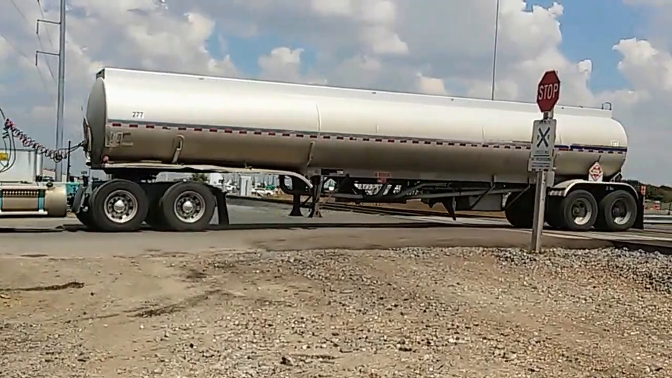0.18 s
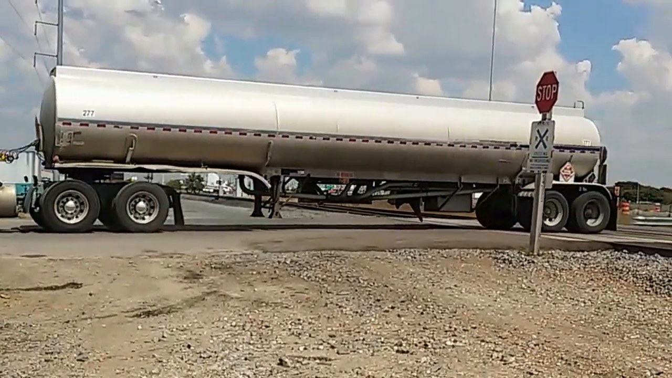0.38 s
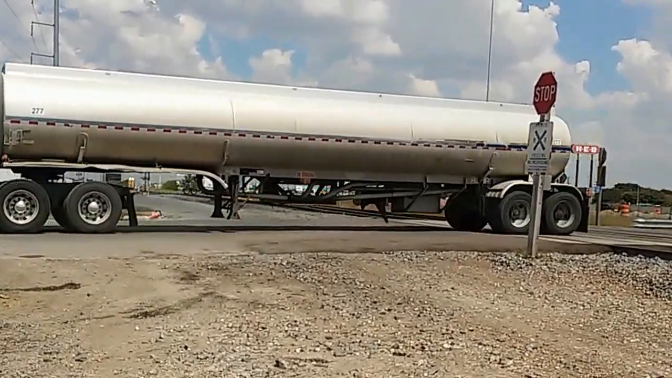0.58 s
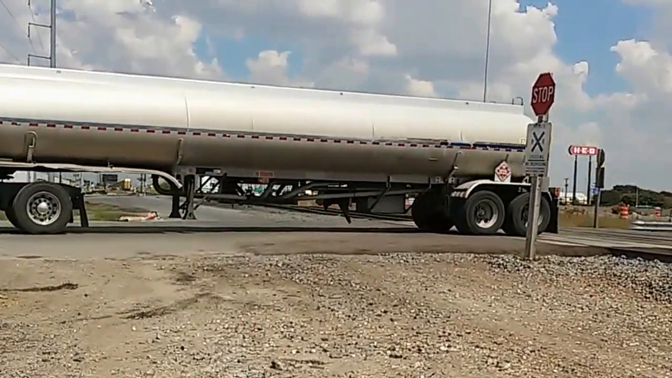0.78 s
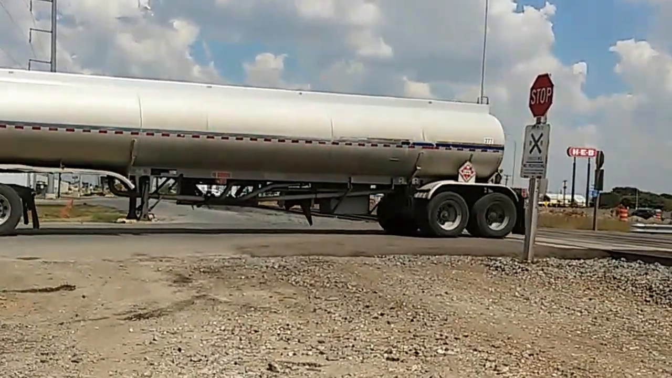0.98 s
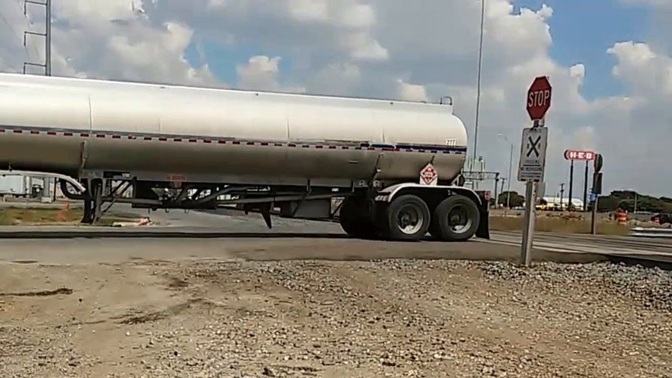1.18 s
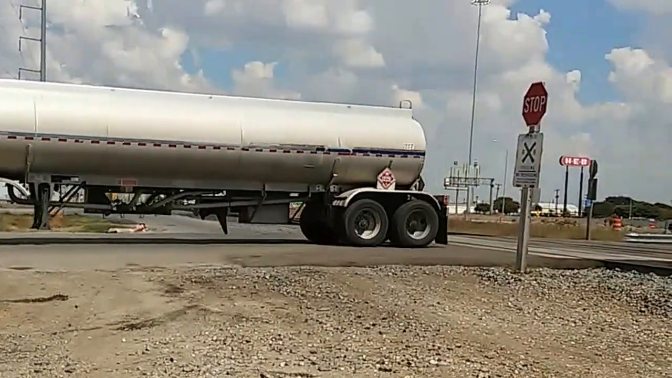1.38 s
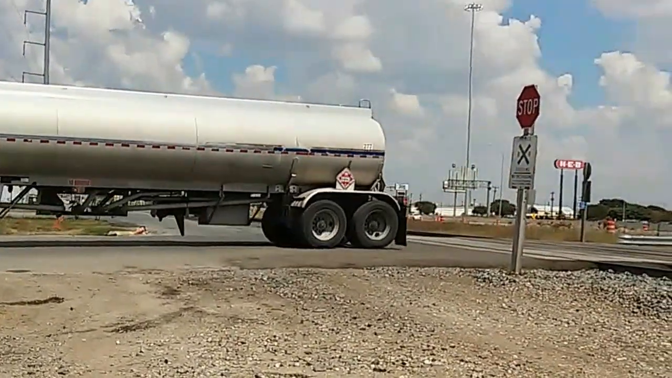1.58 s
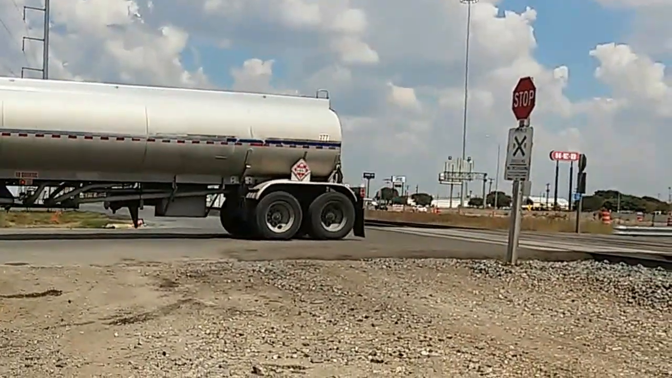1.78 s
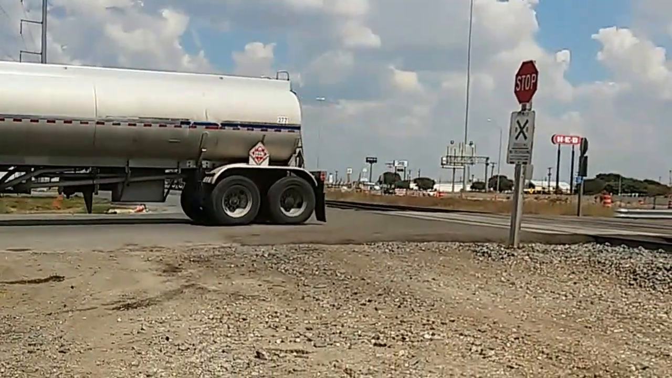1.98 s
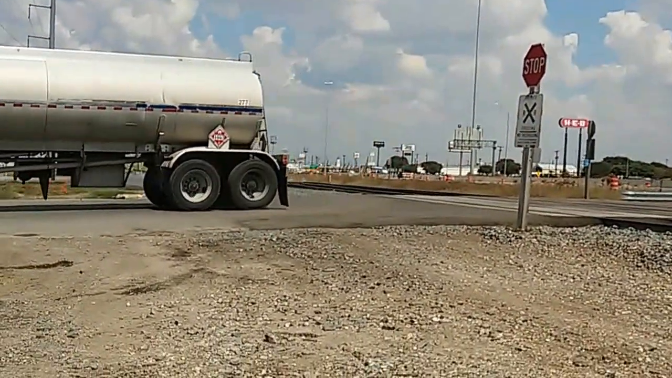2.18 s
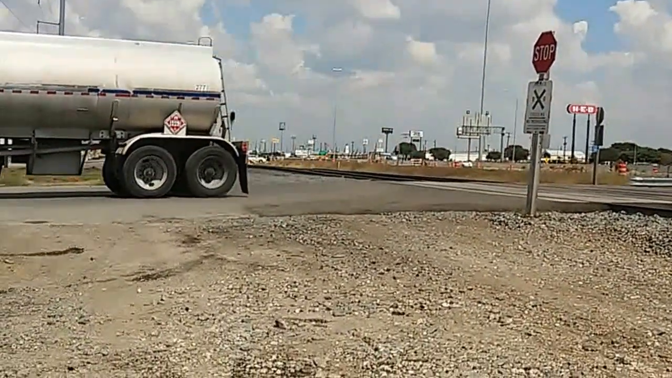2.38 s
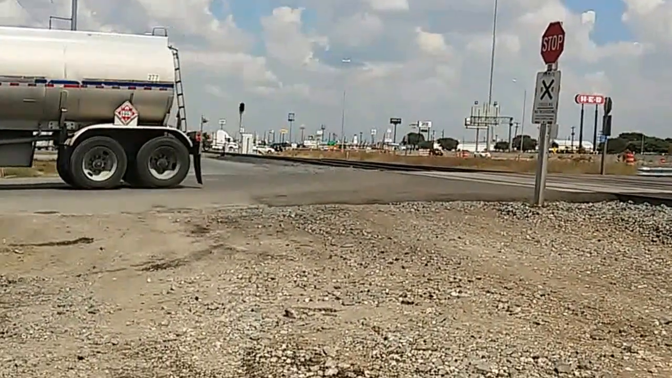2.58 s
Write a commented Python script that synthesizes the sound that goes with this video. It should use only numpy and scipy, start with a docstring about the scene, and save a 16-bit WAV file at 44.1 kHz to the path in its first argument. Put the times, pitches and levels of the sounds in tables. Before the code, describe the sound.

A sudden loud air-brake release hisses from a diesel tanker truck and thins out quickly; the engine then clatters and drones unevenly upward, with trailer rasps and squeaks, heard outdoors in mono from the gravel roadside.

```python
"""A diesel tanker truck pulls away from a railway crossing, heard in mono from the gravel verge.
Low wind buffets come first, over tyres and an engine bay's whine; then the air system dumps its pressure
in one sharp, loud hiss of shaped noise. The engine speed dips, then climbs unevenly: firings drone as
multiples of the bank rate and pulse the noise of puffs and clatter. Later the exhaust booms, the trailer's
running gear rasps and squeaks in short noise swells, and the hissing turbo starts a climbing whistle."""
import sys
import numpy as np
from scipy import signal
from scipy.fft import rfft, irfft
from scipy.io import wavfile
from scipy.ndimage import uniform_filter1d

SR = 44100
rng = np.random.default_rng(int(sys.argv[2]) if len(sys.argv) > 2 else 0)


def transcribe(signal):
    """Save signal, clipped to [-1, 1], as a 16-bit WAV file at the path in sys.argv[1]."""
    frames = np.atleast_2d(signal).T
    limited = np.clip(frames, -1, 1)
    pcm = np.round(limited * 32767).astype(np.int16)
    wavfile.write(sys.argv[1], SR, pcm)


N = 114660  # samples, 2.6 s
TOP_HZ = 15750  # upper limit of the sound

# Spectrum of the low rumble of exhaust and tyres. Each row: frequency in Hz, density in dB per Hz.
RUMBLE_SPECTRUM = [(20, -12), (45, -10.5), (70, -9), (100, -3), (175, -1.5), (250, -3.5), (355, -7),
                   (450, -12), (600, -12.5), (800, -26), (1500, -55)]


def undb(db):
    """Level to amplitude: 20 dB is a factor of ten."""
    return 10 ** (np.asarray(db) / 20)


def unit(x):
    """Normalisation: scale to rms 1."""
    return x / np.sqrt(np.mean(x ** 2))


def curve(rows, axis=1):
    """Linear interpolation: one column of a time table, sample by sample."""
    rows = np.array(rows, float)
    return np.interp(np.arange(N) / SR, rows[:, 0], rows[:, axis])


def lift(hz, peaks):
    """Resonance: decibels that peaks of given frequency, width and height add at these frequencies."""
    return sum(db / (1 + (2 * (hz - f) / width) ** 2) for f, width, db in peaks)


def colour(x, points, peaks=()):
    """Spectral shaping: filter a sound by a spectrum and resonances, and scale it to rms 1."""
    hz = np.arange(N // 2 + 1) * SR / N + 1e-3  # the offset avoids log(0)
    points = np.array(points, float)
    db = np.interp(np.log(hz), np.log(points[:, 0]), points[:, 1]) + lift(hz, peaks)
    low_cut = np.minimum(hz / points[0, 0], 1) ** 2
    gain = undb(db) * low_cut * (hz < TOP_HZ)
    return unit(irfft(rfft(x) * gain, N))


def noise():
    """White noise: independent samples have equal power at all frequencies."""
    return rng.standard_normal(N)


def walk(rate):
    """Slow random fluctuation: noise averaged twice over 1/rate seconds, with a spread of 1."""
    k = max(int(SR / rate), 1)
    once = uniform_filter1d(noise(), k, mode="wrap")
    return unit(uniform_filter1d(once, k, mode="wrap"))


def swell(t, at, length):
    """Gaussian envelope: a brief swell with its top at one moment."""
    return np.exp(-((t - at) / length) ** 2)


def road_and_wind(t):
    """Broadband excitation: tyres rumble on the road; puffs of wind strike the microphone."""
    # Level of the tyres. Each row: time in seconds, level in dB.
    road_level = [(0, -41.5), (.18, -49), (.4, -53), (.7, -52.5), (1.0, -50.5), (1.4, -49.5), (1.9, -50),
                  (2.25, -50.5), (2.4, -48.5), (2.6, -53)]
    # Puffs of wind. Each row: time of the top in seconds, level in dB, length in seconds.
    puffs_of_wind = [(0.013, -42, 0.017), (0.137, -38, 0.02), (0.29, -56, .04), (1.29, -53, 0.049)]
    # Spectrum of the wind. Each row: frequency in Hz, density in dB per Hz.
    wind_spectrum = [(18, -8), (35, 1), (70, -2), (130, -7), (250, -2.5), (600, -50)]
    road = undb(curve(road_level) + walk(35)) * colour(noise(), RUMBLE_SPECTRUM)
    gusts = sum(undb(db) * swell(t, at, length) for at, db, length in puffs_of_wind)
    return road + gusts * colour(noise(), wind_spectrum)


def running_gear(t):
    """Amplitude modulation: short grainy noise rasps swell and fade in the trailer's metalwork."""
    # Rasps. Each row: time of the top in seconds, level in dB, rise in seconds, fall in seconds,
    # gain of the treble in dB.
    rasps = [(1.427, -38.5, .035, 0.14, 6), (1.59, -41, 0.023, 0.018, -2), (1.78, -41.5, .022, 0.055, -8),
             (2.038, -36, 0.029, .025, -3.5), (2.104, -36.5, 0.031, 0.049, 0),
             (2.262, -47, 0.025, .035, 6.5), (2.43, -32.5, 0.026, 0.033, -3.5),
             (2.472, -34.5, 0.03, 0.075, -3)]
    # Spectrum of the rasps. Each row: frequency in Hz, density in dB per Hz.
    gear_spectrum = [(400, -20), (780, -27), (1050, 1.5), (1450, -6), (1850, 2.5), (2080, 4.5), (2400, -3),
                     (3300, -2), (4000, 2.5), (4600, -2), (5400, -5), (6200, -9), (8000, -13), (9600, -6),
                     (11200, -2), (12800, -8.5), (15500, -13)]
    grain_db = 1
    rasp = colour(noise() * undb(grain_db * walk(500)), gear_spectrum)
    treble = signal.sosfiltfilt(signal.butter(2, 6500, "high", fs=SR, output="sos"), rasp)
    out = np.zeros(N)
    for at, db, rise, fall, treble_db in rasps:
        before = np.minimum(t - at, 0) / rise
        after = np.maximum(t - at, 0) / fall
        # Gaussian rise, then a rounded top that falls nearly exponentially
        shape = np.exp(-before ** 2 + 1 - np.hypot(1, 2 * after) ** 0.97)
        out += undb(db) * shape * (rasp + (undb(treble_db) - 1) * treble)
    return out


def squeaks(t):
    """Narrow-band noise: slow random amplitudes on a sine and cosine make each squeak of metalwork rough."""
    # Squeaks. Each row: time of the top in seconds, frequency in Hz, level in dB, length in seconds.
    squeak_rows = [(1.164, 2755, -51, 0.052), (1.405, 2773, -39, 0.024), (1.431, 1873, -41, 0.051),
                   (1.414, 2470, -41, 0.022), (1.438, 4530, -40.5, 0.017), (1.47, 2830, -41.5, 0.049),
                   (1.63, 1151, -46, 0.066), (2.032, 2130, -41, 0.013), (2.103, 2050, -39.5, 0.02),
                   (2.272, 2162, -44, 0.02), (2.263, 3660, -49.5, 0.024), (2.442, 2120, -47, 0.014),
                   (2.47, 5350, -44, 0.021)]
    roughness_hz = 260  # rate of the random amplitudes
    out = np.zeros(N)
    for at, hz, db, length in squeak_rows:
        angle = 2 * np.pi * hz * t
        tone = unit(walk(roughness_hz) * np.sin(angle) + walk(roughness_hz) * np.cos(angle))
        out += undb(db) * swell(t, at, length) * tone
    return out


def turbo():
    """Flow noise and rotor tone: air hisses through the turbo; its whistle climbs as it spools up."""
    # Spectrum of the air's hiss. Each row: frequency in Hz, density in dB per Hz.
    hiss_spectrum = [(3000, -20.5), (5000, -11.5), (7000, -11), (8700, -10), (9700, -3.5), (10800, 1.5),
                     (11600, -2.5), (12500, -8), (14000, -17), (15800, -32)]
    # Level of the hiss. Each row: time in seconds, level in dB.
    hiss_level = [(0, -36.5), (.08, -35.5), (.2, -43.5), (.68, -44.5), (.82, -50), (.9, -43), (1.08, -45.5),
                  (1.2, -55.5), (1.28, -49), (1.33, -42.5), (1.46, -39), (1.62, -44), (1.8, -44.5),
                  (1.96, -59), (2.2, -56), (2.37, -61), (2.6, -56)]
    # Narrow singing edge on the hiss. Each row: frequency in Hz, width in Hz, lift in dB.
    edge_peak = [(10830, 900, 42)]
    # Level of the edge. Each row: time in seconds, level in dB.
    edge_level = [(0, -32.5), (.08, -37.5), (.2, -45), (.6, -61), (1.2, -74)]
    # Whistle. Each row: time in seconds, frequency in Hz, level in dB.
    whistle_path = [(1.7, 7700, -78), (1.87, 8000, -82), (2.15, 8730, -55), (2.38, 9545, -69),
                    (2.6, 10000, -68)]
    upper_ratio, upper_db = 1.5, -1  # second whistle tone
    pitch_waver = 0.006  # spread as a share of the frequency

    hiss = colour(noise(), hiss_spectrum) * undb(curve(hiss_level) + 0.84 * walk(48))
    edge = undb(curve(edge_level)) * colour(noise(), hiss_spectrum, edge_peak)
    pitch = curve(whistle_path) * (1 + pitch_waver * walk(200))
    angle = 2 * np.pi * np.cumsum(pitch) / SR
    lower = undb(3 * walk(30)) * np.sin(angle)
    upper = undb(upper_db + 3.5 * walk(30)) * np.sin(upper_ratio * angle)
    return hiss + edge + (lower + upper) * undb(curve(whistle_path, axis=2))


def exhaust_drone(turn):
    """Harmonic series: periodic firing sounds multiples of the bank rate in the exhaust."""
    # Drone. Each row: time in seconds, levels of the 2nd, 4th and 5th multiple in dB.
    drone_levels = [(0, -60, -52, -66), (.27, -55, -56, -60), (.42, -72, -51.5, -68),
                    (.6, -49.5, -52.5, -58), (.8, -61, -56.5, -49.5), (.92, -57, -52, -47.5),
                    (1.08, -56, -53, -60.5), (1.22, -55.5, -52, -45.5), (1.33, -58, -54, -41),
                    (1.45, -51, -63, -46.5), (1.64, -52, -57.5, -52), (2.1, -56.5, -57, -64.5),
                    (2.45, -52, -68, -53), (2.6, -55, -39, -53)]
    waver_db = 0.8
    out = np.zeros(N)
    for column, multiple in enumerate((2, 4, 5), start=1):
        level = curve(drone_levels, axis=column) + waver_db * walk(4.3)
        out += undb(level) * np.sin(2 * np.pi * (multiple * turn + rng.random()))
    return np.sqrt(2) * out  # a sine of rms 1 has this peak


def exhaust_booms(t):
    """Frequency modulation: brief low tones of wandering pitch boom in the exhaust."""
    # Booms. Each row: time of the top in seconds, frequency in Hz, level in dB, length in seconds.
    boom_rows = [(1.62, 368, -56.5, 0.058), (1.793, 359.6, -50, 0.05), (2.554, 351, -41.5, 0.022)]
    wander_hz = 7
    out = np.zeros(N)
    for at, hz, db, length in boom_rows:
        angle = 2 * np.pi * np.cumsum(hz + wander_hz * walk(61)) / SR
        out += undb(db) * swell(t, at, length) * np.sin(angle)
    return np.sqrt(2) * out


def wander(x):
    """Independent band fluctuation: parts of a sound swell and sink on their own below a steady top band."""
    wander_db = 0.6
    out = 0
    for split_hz in (1130, 2000, 4700):
        low = signal.sosfiltfilt(signal.butter(4, split_hz, fs=SR, output="sos"), x)
        out = out + low * undb(wander_db * walk(21))
        x = x - low
    return out + x


def block_clatter(kick):
    """Partly pulsed noise: each firing kick swells the clatter of the block."""
    # Spectrum of the clatter. Each row: frequency in Hz, density in dB per Hz.
    clatter_spectrum = [(300, -8), (600, -5), (790, -9), (1000, 4), (1170, 5), (1400, 2), (1750, 5),
                        (2020, 6), (2350, -2.5), (2750, 0), (3300, -5.5), (4400, -7.5), (6300, -15.5),
                        (9000, -17), (15500, -14)]
    # Level of the clatter. Each row: time in seconds, level in dB.
    clatter_level = [(0, -42), (.18, -42), (.5, -50.5), (.8, -43.5), (1.0, -44.5), (1.25, -43), (1.42, -40),
                     (1.63, -39), (1.78, -42.5), (1.95, -43), (2.2, -45.5), (2.38, -45), (2.6, -44.5)]
    pulsing = 0.3  # share of the amplitude that follows the kicks
    pulsed = (1 - pulsing + pulsing * unit(kick)) * noise()
    return wander(colour(pulsed, clatter_spectrum)) * undb(curve(clatter_level) + 0.5 * walk(60))


def bay_whine():
    """Band-shaped noise: a rough whine from the engine bay fades as the cab moves away."""
    # Spectrum of the whine. Each row: frequency in Hz, density in dB per Hz.
    whine_spectrum = [(850, -17), (1080, -4), (1400, -34), (1750, -17), (2040, 3), (2350, -13),
                      (2700, -7.5), (3300, -22)]
    # Level of the whine. Each row: time in seconds, level in dB.
    whine_level = [(0, -49), (.17, -41.5), (.45, -44), (.7, -50.5), (1.1, -52), (1.5, -56)]
    return undb(curve(whine_level) + 1.2 * walk(6.7)) * colour(noise(), whine_spectrum)


def engine(t):
    """Periodic excitation: one firing phase drives the drone, the exhaust puffs and the block's clatter."""
    # Engine speed. Each row: time in seconds, firings of one three-cylinder bank per second.
    speed = [(0, 34.7), (.27, 27), (.45, 31.8), (.61, 31.8), (.8, 35), (.93, 34.8), (1.05, 33), (1.2, 34.9),
             (1.32, 36.2), (1.45, 36.8), (1.66, 36.9), (2.11, 43.2), (2.43, 39), (2.6, 44.6)]
    puff_db, firing_scatter_db = -56, 4
    decay = 0.87  # of a kick, in firing cycles
    turn = np.cumsum(curve(speed) * (1 + 0.003 * walk(21))) / SR
    firing, phase = np.divmod(2 * turn, 1)  # two banks fire in turn
    strength = undb(firing_scatter_db * noise()[firing.astype(int)])
    kick = strength * np.exp(-phase / decay)
    puffs = undb(puff_db) * colour(kick * noise(), RUMBLE_SPECTRUM)
    return exhaust_drone(turn) + exhaust_booms(t) + puffs + bay_whine() + block_clatter(kick)


def reflections(t, truck):
    """Diffuse reflection: convolution with decaying noise scatters sound from the tank and the ground."""
    decay_s, onset_s, level_db = 0.057, 0.0013, -11
    scatter = noise() * np.exp(-t / decay_s) * (1 - np.exp(-t / onset_s))
    scatter = scatter / np.sqrt(np.sum(scatter ** 2))  # unit energy
    scatter = signal.sosfilt(signal.butter(2, 600, "high", fs=SR, output="sos"), scatter)
    return undb(level_db) * signal.fftconvolve(truck, scatter)[:N]


def air_dump(t):
    """Jet noise: released air blasts; the outlet's roar dies first, the hiss thins to a last bleed."""
    # Spectra of the jet's hiss, the outlet's roar and the last thin bleed of air.
    # Each row: frequency in Hz, density in dB per Hz.
    jet_spectrum = [(1500, -18), (4000, -18.5), (5400, -12), (6200, -11.5), (8000, -13), (9500, -14.5),
                    (10500, -0.5), (11500, -3), (12500, -5), (14000, -7.5), (15800, -11)]
    roar_spectrum = [(200, -28), (400, -12.5), (660, 3), (900, -11.5), (1150, -1.5), (1400, -9),
                     (1800, 1.5), (2700, -0.5), (3200, 5.5), (3550, -1), (4150, 10.5), (4750, -1.5),
                     (5300, 13.5), (6000, -9), (9000, 3.5), (15800, -1.5)]
    bleed_spectrum = [(900, -1.5), (2000, -13), (3400, -1.5), (4200, 3.5), (4700, -2), (5450, 7), (6000, 0),
                      (6500, 3), (8000, 1.5), (8500, 8), (11000, 8), (13300, -7), (15500, -23)]
    # Narrow resonances of nozzle and outlet. Each row: frequency in Hz, width in Hz, lift in dB.
    nozzle_peaks = [(9900, 33, -3), (10606, 40, -5), (10550, 35, -9), (11570, 33, 8), (11100, 40, 6.5),
                    (11600, 51, -2)]
    outlet_peaks = [(2423, 26, 12), (3309, 26, 11), (7554, 36, 16)]
    full_bore_s, open_db_per_s = 0.2331, 1415
    age = t - full_bore_s
    opening = undb(open_db_per_s * np.minimum(age, 0) + 0.5 * walk(120))  # the valve cracks open

    def run_down(db, hold_s, fall_db_per_s):
        """Exponential discharge: full bore, then a steady fall in decibels."""
        return undb(db - fall_db_per_s * np.maximum(age - hold_s, 0))

    jet = run_down(-9.5, 0.012, 91.5) * colour(noise(), jet_spectrum, nozzle_peaks)
    roar = run_down(-16.5, 0.042, 153) * colour(noise(), roar_spectrum, outlet_peaks)
    bleed = run_down(-32, 0.21, 55) * colour(noise(), bleed_spectrum)
    return opening * (jet + roar + bleed)


def scene():
    """Superposition: the truck with its close reflections, air dump, road and wind, alike in both channels."""
    t = np.arange(N) / SR
    truck = running_gear(t) + squeaks(t) + turbo() + engine(t)
    mono = road_and_wind(t) + truck + reflections(t, truck) + air_dump(t)
    return np.array([mono, mono])


def record(dry):
    """Clipping and band limitation: peaks are held at full scale, then the top is cut steeply."""
    top_cut = signal.ellip(12, 0.1, 80, TOP_HZ, fs=SR, output="sos")
    return signal.sosfilt(top_cut, np.clip(dry, -1, 1))


dry = scene()
out = record(dry)
transcribe(out)
```